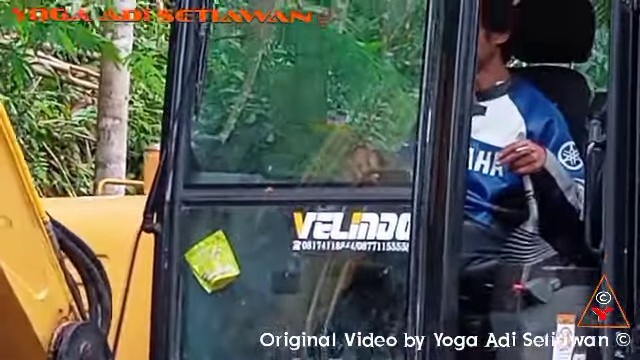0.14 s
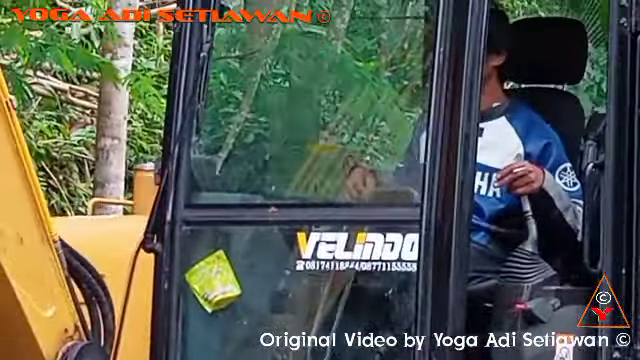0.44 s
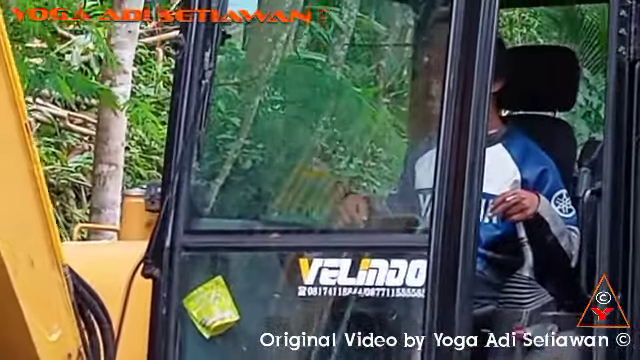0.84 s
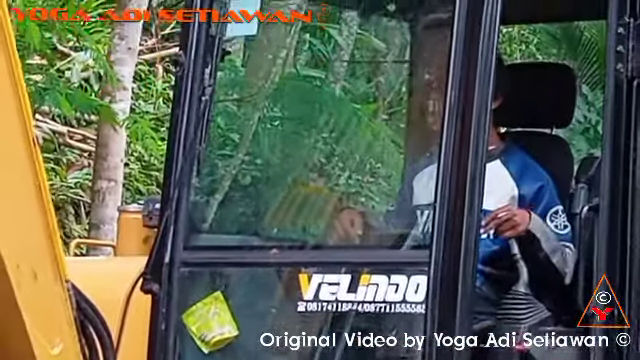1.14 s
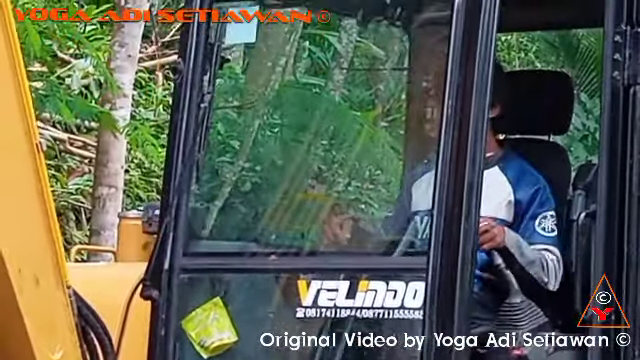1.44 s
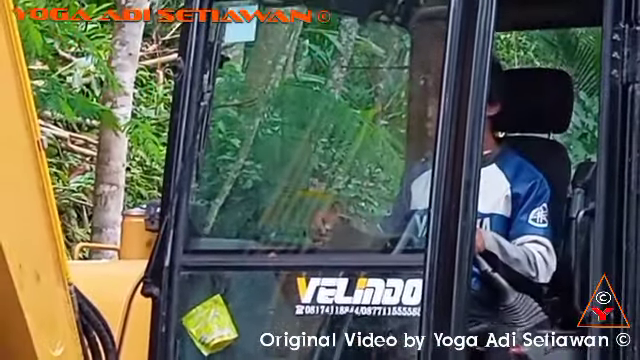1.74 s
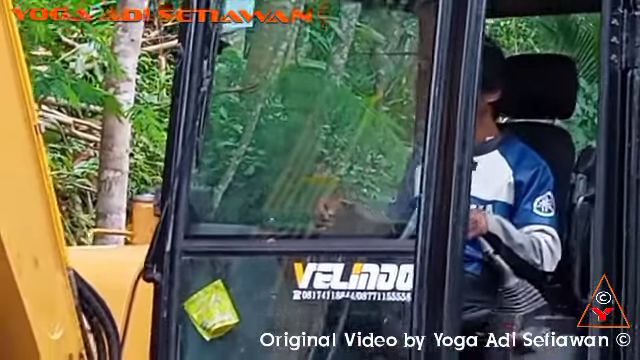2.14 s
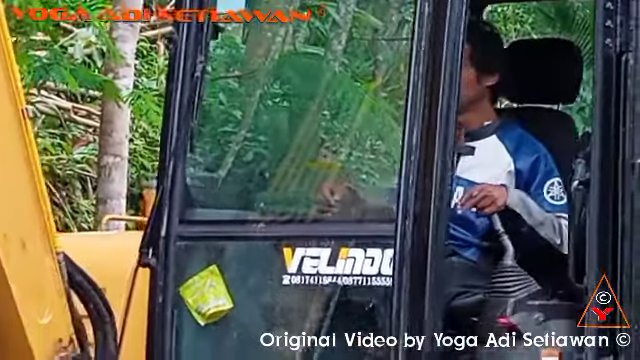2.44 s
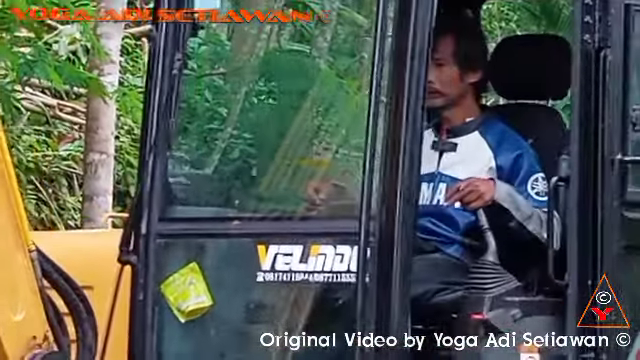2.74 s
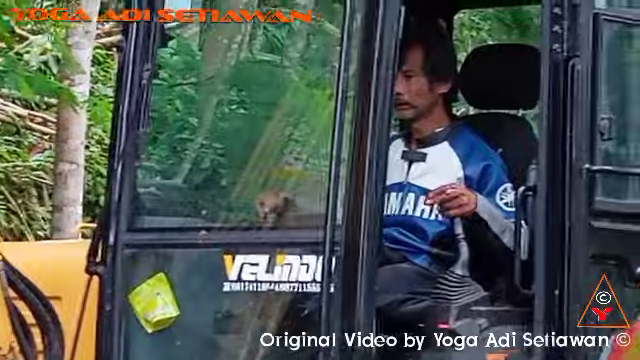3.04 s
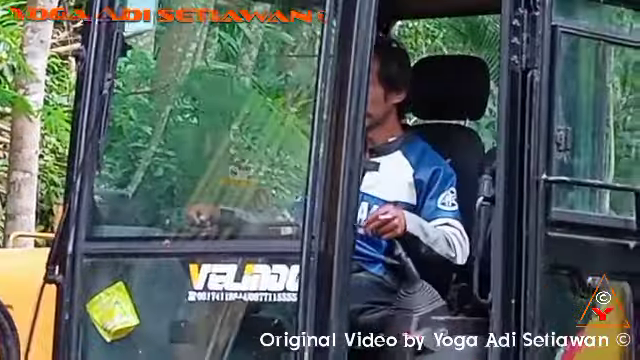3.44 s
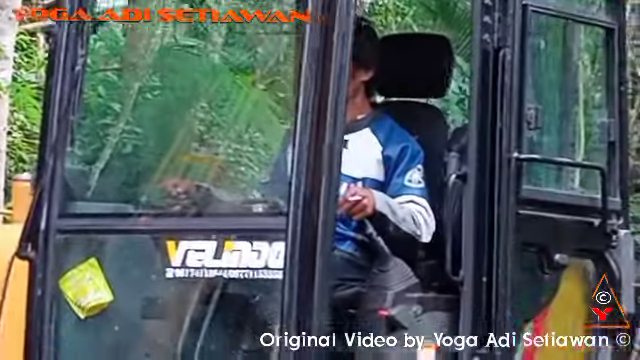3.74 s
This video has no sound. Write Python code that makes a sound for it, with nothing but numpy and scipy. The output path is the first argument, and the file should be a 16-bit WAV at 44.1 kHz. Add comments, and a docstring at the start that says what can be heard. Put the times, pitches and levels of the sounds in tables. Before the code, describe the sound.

A small digger works outdoors at a forest edge, its diesel engine humming throughout. Its steel bucket then makes three bursts of sharp cracks and dull thuds, with loose bits ticking between. A thin insect-like whine hangs over everything.

```python
"""A steady diesel hum, with a hydraulic pump singing along: a small excavator at a forest edge.
A thin, rough whine near 4.7 kHz, most likely insects, and a soft hiss hang over everything.
After a faint groan and squeal the bucket digs: dull knocks, then sharp, splintering cracks
and ticking loose bits. These ring the steel bucket, and the cracks and ticks echo off the trees."""
import sys
import numpy as np
from scipy import signal
from scipy.fft import rfft, irfft, next_fast_len
from scipy.io import wavfile
from scipy.ndimage import map_coordinates

SR = 44100
rng = np.random.default_rng(int(sys.argv[2]) if len(sys.argv) > 2 else 0)


def dump_mix(stems):
    """Bounce the given channels to the path in sys.argv[1] as a 16-bit WAV at rate SR."""
    frames = np.atleast_2d(stems).T  # one column per channel
    limited = np.clip(frames, -1, 1)  # hard clip at full scale
    pcm = np.round(limited * 32767).astype(np.int16)
    wavfile.write(sys.argv[1], SR, pcm)


N = 171990

# How strong each pitch is when something breaks: pitch_hz, level_db
CRACK_COLOUR = [(50, -62), (95, -15), (140, -2), (330, -2), (540, -6.5), (700, -1.5), (900, 0),
                (1130, -6.5), (1450, -2), (2050, -4.5), (2900, -1), (3950, -12), (4700, -7), (6200, -10),
                (7100, -11), (7900, -26), (10000, -31), (13000, -45), (15200, -32)]
CRACK_RISE_S = 0.0017


def amp(db):
    """Turn decibels into a number to multiply by."""
    return 10 ** (np.asarray(db) / 20)


def unit(x):
    """Scale a sound to an average (rms) strength of 1."""
    return x / np.sqrt(np.mean(x ** 2) + 1e-20)


def along(points, hz):
    """Read between (pitch_hz, value) points on a log pitch scale."""
    pitches, values = np.transpose(points)
    return np.interp(np.log(hz + 1), np.log(pitches + 1), values)


def curve(points):
    """Join (time_s, value) points with straight lines, one value per sample."""
    return np.interp(np.arange(N) / SR, *np.transpose(points))


def wobble(per_s):
    """A smooth curve through per_s random values a second."""
    return map_coordinates(rng.standard_normal(int(N * per_s / SR) + 4), [np.arange(N) * per_s / SR])


def filtered(x, response):
    """Turn each pitch in a sound up or down by response(hz)."""
    size = next_fast_len(N + SR // 2)
    return irfft(rfft(x, size) * response(np.fft.rfftfreq(size, 1 / SR)), size)[:N]


def noise(colour):
    """Noise of strength 1, shaped by (pitch_hz, level_db) points."""
    return unit(filtered(rng.standard_normal(N), lambda hz: amp(along(colour, hz))))


def lifts(peaks, hz, half_width_hz=0, share=0):
    """Boost in dB from narrow (pitch_hz, boost_db) peaks; share widens each by a part of its pitch."""
    return sum(db / (1 + ((hz - centre) / (half_width_hz + share * centre)) ** 2) for centre, db in peaks)


def engine():
    """The diesel fires twice a turn: clean tones, an uneven boom and a clatter that pulses along."""
    # Tones of the firing and the pump pistons: cycles_per_turn, level_db
    shaft_tones = [(2, -73), (4, -59.5), (9, -61)]
    # Hollow spaces in the exhaust and cab: pitch_hz, half_width_hz, level_db
    hollows = [(145.3, 11.2, -3), (205.4, 11, -6), (163, 31, -10.5)]
    # Overall tone of the clatter: pitch_hz, level_db
    clatter_colour = [(33, -37), (52, -14), (85, -9), (130, -17), (200, -2), (260, -14.5), (330, -13),
                      (460, -14), (540, -19), (630, -12), (780, -6.5), (1000, -22.5), (1500, -19.5),
                      (1850, -26), (2200, -18.5), (2900, -24), (4200, -29.5), (5500, -65)]
    # Ringing panels of the engine cover: pitch_hz, boost_db
    panels = [(625, 6.5), (730, -3), (1260, 10.5), (1620, 8), (2190, 8), (2640, 8.5), (2830, 10.5),
              (3540, 10.5)]
    # How hard the engine works: time_s, level_db
    effort = [(0, -0.5), (1.7, -2), (2.4, -0.5), (3.9, -0.5)]
    shaft_hz, drift = 27.24, 0.0025
    turns = np.cumsum(shaft_hz * (1 + drift * wobble(4.47))) / SR
    tones = np.zeros(N)
    for cycles, db in shaft_tones:
        level = amp(db + wobble(5.77)) * np.sqrt(2)
        tones += level * np.sin(2 * np.pi * (cycles * turns + rng.random()))
    firing = 1 + 0.15 * np.cos(4 * np.pi * turns)
    cavities = lambda hz: sum(amp(db) * (2j * hz * half / (pitch ** 2 - hz ** 2 + 2j * hz * half)) ** 2
                              for pitch, half, db in hollows)
    boom = filtered(firing * rng.standard_normal(N), cavities)
    throb = amp(4 * wobble(per_s=14))
    cover = lambda hz: amp(along(clatter_colour, hz) + lifts(panels, hz, half_width_hz=18.3))
    clatter = filtered(firing * rng.standard_normal(N), cover)
    return tones + amp(curve(effort)) * (amp(-51) * unit(boom * throb) + amp(-54.5) * unit(clatter))


def insects():
    """A high, narrow band of noise flutters and swells like an insect chorus."""
    # Tone of the whine: pitch_hz, level_db
    whine_colour = [(3000, -61), (4340, -50), (4510, 1), (4700, 6.5), (4870, -2), (4985, -31), (5300, -41),
                    (5450, -18), (5700, -17.5), (5850, -44), (9000, -51), (9500, -30.5), (10000, -40.5),
                    (16000, -80)]
    # Slow rise and fall of the chorus: time_s, level_db
    swell = [(0, 2), (.8, 2.5), (1.7, 2), (2.3, 4), (3.2, -0.5), (3.9, 2)]
    chorus = unit(noise(whine_colour) * amp(wobble(per_s=70)))
    return amp(-54.5 + curve(swell)) * chorus


def hiss():
    """The faint, even hiss of the place."""
    # Tone of the hiss: pitch_hz, level_db
    hiss_colour = [(2500, -1.5), (4000, -12), (5200, -4.5), (6100, -6.5), (7000, -4.5), (8200, -13.5),
                   (10000, -18.5), (13000, -26.5), (15200, -17)]
    return amp(-69.5) * noise(hiss_colour)


def groan_and_squeal():
    """Two faint, fluttering tones that arch in pitch and sink."""
    # The low groan and the high squeal: start_s, length_s, start_hz, end_hz, level_db
    glides = [(0.16, 0.3, 355, 330, -65), (0.094, 0.42, 13980, 13900, -81)]
    jitter_hz, flutter_db = 45, 4
    out = np.zeros(N)
    for start_s, length_s, start_hz, end_hz, db in glides:
        progress = np.linspace(0, 1, int(length_s * SR))
        arch = np.abs(np.sin(np.pi * progress))
        hz = (start_hz + (end_hz - start_hz) * progress) * (1 + 0.013 * arch)
        hz += jitter_hz * wobble(700)[:len(hz)]
        level = amp(db + flutter_db * wobble(90.3)[:len(hz)]) * np.sqrt(2 * arch)
        add(out, start_s, level * np.sin(2 * np.pi * np.cumsum(hz) / SR))
    return out


def add(track, start_s, sound):
    """Mix a sound into the track at start_s."""
    part = track[max(round(start_s * SR), 0):][:len(sound)]
    part += sound[:len(part)]


def knocks():
    """Short, dry thuds of the arm ring the bucket's lowest notes."""
    # Knocks of bucket and arm: start_s, level_db, fade_s
    hits = [(1.241, -35.5, 0.14), (2.556, -37, 0.13), (3.421, -40, 0.21), (3.492, -37, 0.3)]
    # Dull tone of a knock: pitch_hz, level_db
    knock_colour = [(60, -31), (125, 1.5), (240, -8.5), (320, -2.5), (420, 3.5), (520, -13), (1500, -17),
                    (3000, -27), (7000, -41), (10000, -59)]
    out = np.zeros(N)
    ring = bucket_ring(lambda hz: along(knock_colour, hz))
    for start_s, db, fade_s in hits:
        add(out, start_s, amp(db) * signal.fftconvolve(burst(rise_s=0.0035, fade_s=fade_s), ring))
    return out


def burst(rise_s, fade_s, size=13000):
    """A cluster of tiny breaks of uneven size, dying away by 60 dB in fade_s."""
    splinters_per_s, spread_db = 970, 2
    t = np.arange(size) / SR
    grit, strengths = rng.standard_normal((2, size))
    splinters = unit(grit * amp(spread_db * strengths[(t * splinters_per_s).astype(int)]))
    shape = (1 - np.exp(-t / rise_s)) * amp(-60 * t / fade_s)
    return splinters * shape / shape.max()


def bucket_ring(colour, size=4096):
    """The steel bucket rings after one tap, whose level in dB at each pitch is colour(hz)."""
    # The bucket's own notes: pitch_hz, boost_db
    bucket_notes = [(320, 11), (385, 11), (927, 7.5), (1538, 1.5), (1625, -2.5), (1712, 2), (2308, 4.5),
                    (3010, 0.5), (3490, 6.5), (5500, 4), (6570, 3.5)]
    hz = np.fft.rfftfreq(size, 1 / SR)
    gain = amp(colour(hz) + lifts(bucket_notes, hz, share=0.01))
    # Fold the response so that all the ringing comes after the tap (minimum phase).
    folded = irfft(np.log(gain))
    folded[1:size // 2] *= 2
    folded[size // 2 + 1:] = 0
    ring = irfft(np.exp(rfft(folded)))
    return ring / np.linalg.norm(ring)


def cracks():
    """Every crack rings the bucket and the piece that breaks, and has its own echo."""
    # Pieces breaking under the bucket: start_s, level_db, bass_db, treble_db, ring_hz, fade_s
    breaks = [(1.387, -46.5, 0, -14, 2630, 0.12), (1.424, -35, -22, -4, 2850, 0.084),
              (1.431, -24, -32, -5.5, 3104, 0.019), (1.440, -31, -1, -0.5, 856, 0.058),
              (1.483, -22, -3.5, 1, 2540, 0.061), (1.499, -32, 7, -19, 807, 0.1),
              (1.509, -32.5, 2, 0.5, 1600, 0.041), (1.545, -44, 11, -9, 2560, 0.13),
              (2.048, -38, 1, -11.5, 966, 0.05), (2.107, -45, -0.5, -10, 2070, 0.13),
              (2.161, -36, 3.5, -2, 1367, 0.082), (2.374, -50, -1, -13, 1610, 0.2),
              (2.428, -43, -2.5, -4, 3350, 0.073), (2.448, -47, -9, 0, 880, .07),
              (2.559, -43.5, -5, -10, 2090, 0.16), (2.656, -40, 14, -5, 1380, 0.11),
              (2.669, -42, -8, -8, 5570, 0.054), (2.712, -45, -6, -12, 3010, 0.036),
              (2.728, -40.5, -1.5, -4.5, 870, 0.078), (2.786, -30.5, 7, 1, 2890, 0.064),
              (2.805, -30.5, -0.5, -2.5, 652, 0.11), (3.271, -36, -2.5, -6.5, 1710, 0.14),
              (3.296, -36, 0, -8, 2435, 0.12), (3.333, -39.5, -0.5, -6.5, 3120, 0.1),
              (3.423, -35.5, 13.5, -3, 906, 0.25), (3.475, -36, 3.5, -8, 1700, 0.095),
              (3.492, -33.5, -12, -1, 706, 0.041), (3.501, -23.5, -5, 5.5, 1385, 0.073),
              (3.514, -26, 0, -5.5, 1681, 0.11)]
    ripple_db, spacing_hz, ring_db = 2.8, 129.96, 12.5
    out = np.zeros(N)
    for start_s, db, bass_db, treble_db, ring_hz, fade_s in breaks:
        tilt = [(450, bass_db), (750, 0), (3500, 0), (5800, treble_db), (14000, 1.34 * treble_db)]
        # Each piece has chance peaks and dips in its tone, plus one clear note.
        ripple = ripple_db * rng.standard_normal(1024)
        piece = lambda hz: (np.interp(hz / spacing_hz, np.arange(len(ripple)), ripple)
                            + lifts([(ring_hz, ring_db)], hz, half_width_hz=57))
        ring = bucket_ring(lambda hz: along(CRACK_COLOUR, hz) + along(tilt, hz) + piece(hz))
        rise_s = CRACK_RISE_S + 0.000068 * max(-treble_db, 0)  # duller cracks start more softly
        crack = signal.fftconvolve(burst(rise_s, fade_s), ring)
        add(out, start_s, amp(db) * among_trees(crack))
    return out


def among_trees(x):
    """The sound itself, then its echo from the trunks, which builds up and lasts longest in the bass."""
    # Time the echo takes to fall by 60 dB: pitch_hz, fade_s
    echo_fades = [(150, 1), (500, 0.47), (2500, 0.48), (7000, 0.35), (14000, 0.3)]
    echo_db, build_s = -11, 0.012
    hz, t, bands = signal.stft(rng.standard_normal(SR // 2), SR, nperseg=256)
    fade = amp(-60 * t / along(echo_fades, hz)[:, None])
    tail = signal.istft(bands * fade * (1 - np.exp(-t / build_s)), SR, nperseg=256)[1]
    echo = amp(echo_db) * tail / np.linalg.norm(tail)
    return signal.fftconvolve(x, signal.unit_impulse(len(echo)) + echo)


def debris():
    """Small bits tick down between the cracks, and rattle thickly before the last loud one."""
    # Showers of loose bits: start_s, end_s, bits_per_s, level_db
    showers = [(1.945, 3.2, 9.5, -47.5), (3.253, 3.409, 90, -47.5), (3.396, 3.484, 120, -44.5)]
    # How much duller a bit sounds than a crack: pitch_hz, change_db
    dulling = [(900, 1), (3200, -8), (5500, -22)]
    out = np.zeros(N)
    ring = bucket_ring(lambda hz: along(CRACK_COLOUR, hz) + along(dulling, hz))
    for start_s, end_s, per_s, db in showers:
        count = int((end_s - start_s) * per_s)
        for k, (delay, strength) in enumerate(rng.random((count, 2))):
            tick = signal.fftconvolve(burst(CRACK_RISE_S, fade_s=0.025, size=2048), ring)
            add(out, start_s + (k + delay) / per_s, amp(db) * (0.5 + strength) * tick)
    return among_trees(out)[:N]


def scene():
    """The machine, the forest and the digging, mixed into one channel."""
    return (engine() + insects() + hiss() + groan_and_squeal() + knocks() + cracks() + debris())[None]


def record(dry):
    """Cut away the very highest treble."""
    return filtered(dry[0], lambda hz: hz < 15520)[None]


dry = scene()
out = record(dry)
dump_mix(out)
```